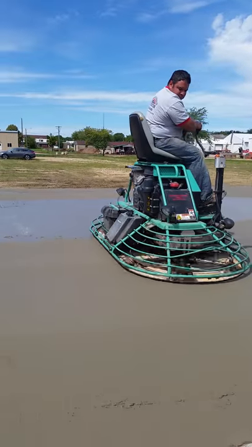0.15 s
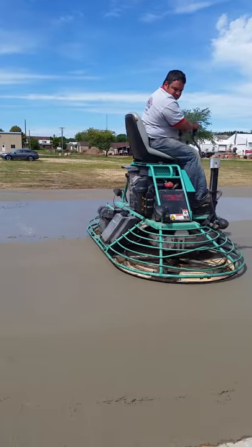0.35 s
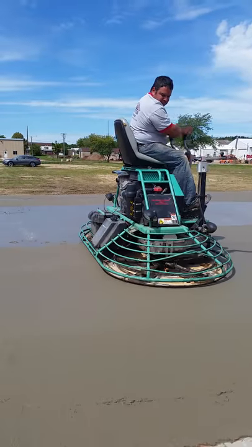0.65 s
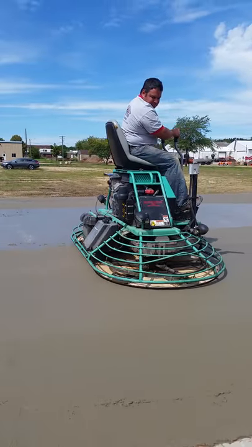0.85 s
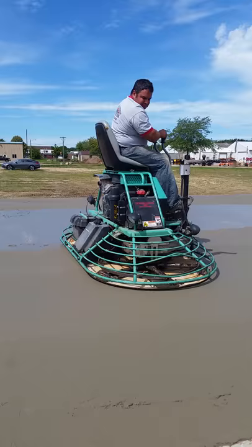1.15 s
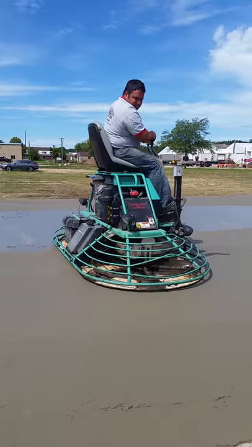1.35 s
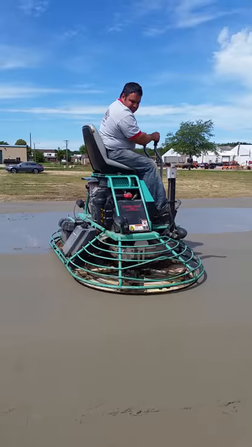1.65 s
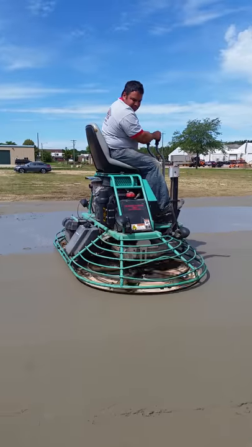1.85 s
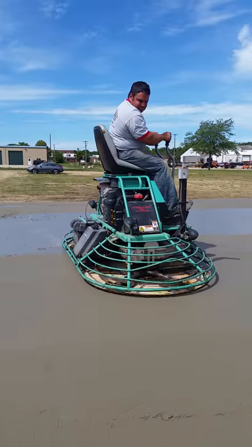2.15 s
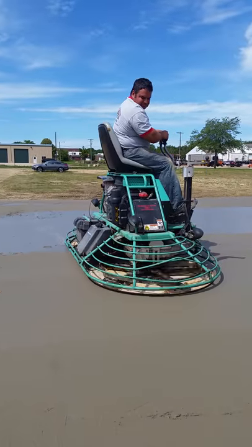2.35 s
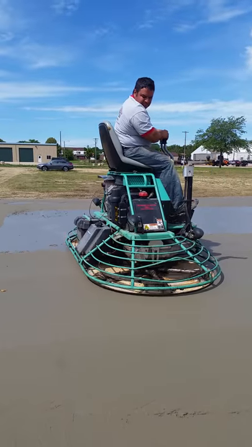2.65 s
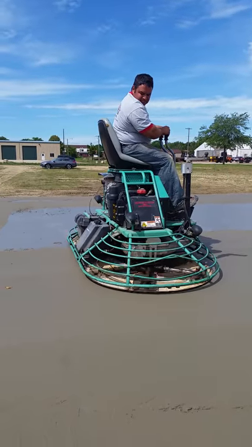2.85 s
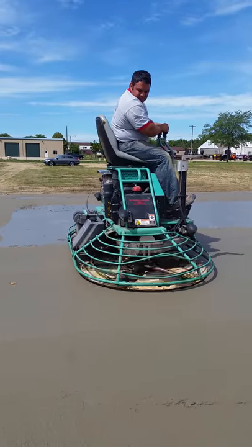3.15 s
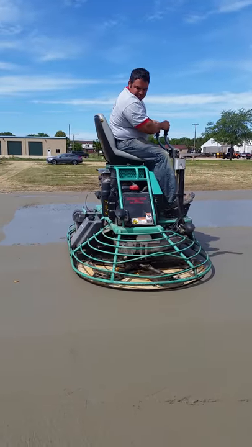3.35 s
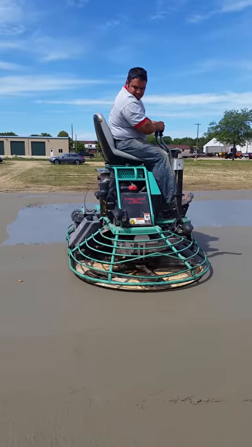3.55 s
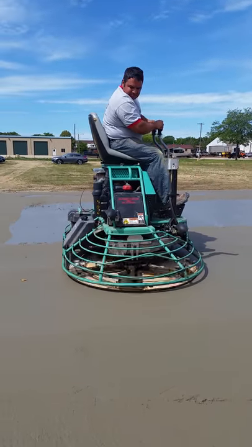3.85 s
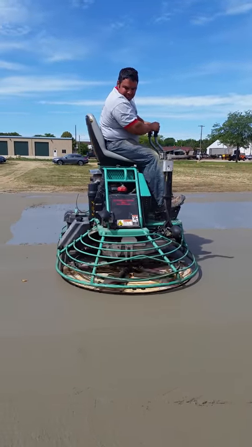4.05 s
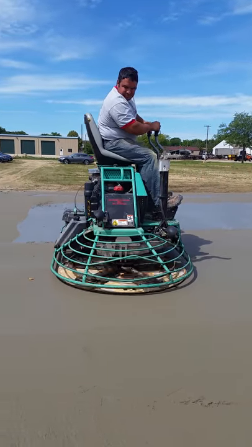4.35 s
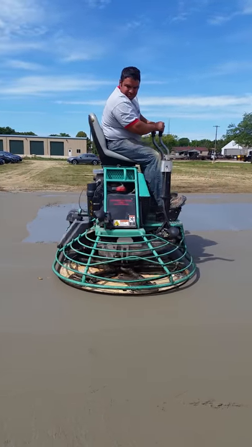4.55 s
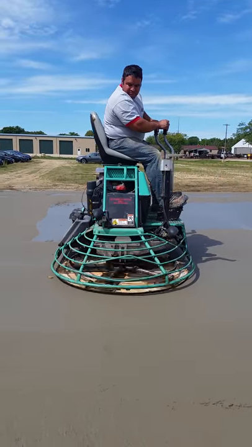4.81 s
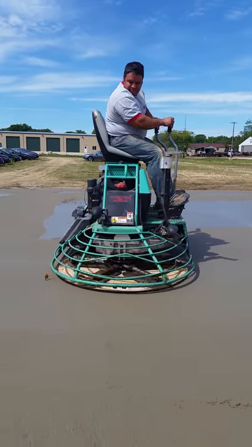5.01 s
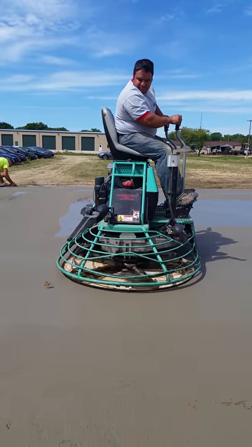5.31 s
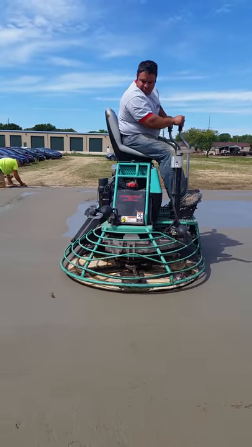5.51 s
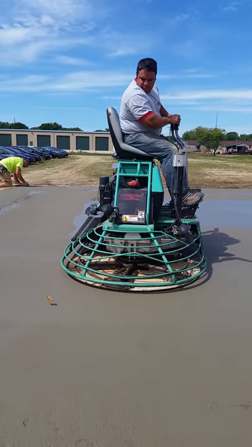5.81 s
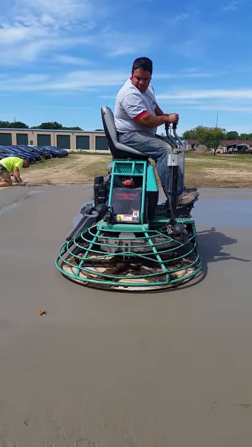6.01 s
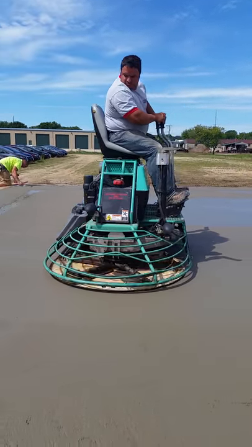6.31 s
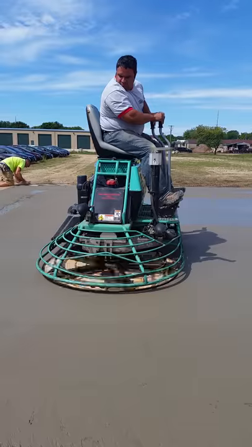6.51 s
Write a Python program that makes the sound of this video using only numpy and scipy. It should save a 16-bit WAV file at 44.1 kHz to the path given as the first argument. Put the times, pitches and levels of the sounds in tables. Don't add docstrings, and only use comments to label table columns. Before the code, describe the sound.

From 0 to about 6.7 seconds a ride-on power trowel runs without a break on wet concrete outdoors, a few metres from a hand-held phone. The two-cylinder engine gives a rough, lumpy drone, about 25 uneven double pulses per second, with its strongest boom near 120 Hz. Pitch sags slightly by 0.5-0.8 seconds as the boom strengthens, recovers a little around 1.5-1.9, then settles lower with small wavers. Throbbing casing roar fills the mids; steel pans spread a fine gritty hiss with blade flicker and tiny valve ticks, and gears whine very faintly. Between roughly 1.3 and 5.2 seconds the exhaust tone is a touch brighter as the machine turns, while the hiss colour shifts near 1.75. From 5.5 it is slightly louder and fuller, boom peaking around 6.2, and still running at the end. Stereo is narrow in the lows, wider in the hiss, dry and open.

```python
import sys
import numpy as np
from scipy import signal
from scipy.fft import rfft, irfft, next_fast_len
from scipy.io import wavfile

SR = 44100
rng = np.random.default_rng(int(sys.argv[2]) if len(sys.argv) > 2 else 0)


def digitize_waveform(pressure):
    field = np.atleast_2d(pressure).T
    bounded = np.clip(field, -1, 1)
    quanta = np.round(bounded * 32767).astype(np.int16)
    wavfile.write(sys.argv[1], SR, quanta)


def how_loud(loudness_db):
    steps = np.asarray(loudness_db, float) / 20
    return 10 ** steps


N = 294147

SECOND_FIRING = 0.425


def in_time(rows):
    seconds, *columns = np.transpose(rows)
    return [np.interp(np.arange(N) / SR, seconds, column) for column in columns]


def at_hz(points, hz):
    point_hz, value = np.transpose(points)
    return np.interp(np.log(hz), np.log(point_hz), value)


def drift(rate_hz):
    r = np.exp(-80 * np.pi * rate_hz / SR)
    coarse = rng.standard_normal(N // 40 + 2002)
    slow = signal.lfilter([1], [1, -2 * r, r * r], coarse)[2000:]
    return np.interp(np.arange(N) / 40, np.arange(len(slow)), slow / slow.std())


def slewing():
    t = np.arange(N) / SR
    facing = np.interp(t, [1.3, 2.1, 5.15, 5.4], [0, 1, 1, 0])
    eighth_db = -29 + 2.5 * facing - 0.1 * drift(2.2)

    side_from_s, side_to_s = 1.2, 3.9
    side_on = np.clip((t - side_from_s) / (side_to_s - side_from_s), 0, 1)
    cancelled_db, uncancelled_db, wander_db = -47, -39.5, 1.5
    cancel_db = cancelled_db + (uncancelled_db - cancelled_db) * side_on
    cancel_db = cancel_db + wander_db * (2 - side_on) * drift(2.5)
    return eighth_db, cancel_db


def exhaust(cycle, boom_db):
    # (order [times the cycle rate], level [dB against the boom])
    orders = [(1, -25), (2, -11), (3, -14.5), (4, -25), (5, 0.5), (6, -10), (7, -21), (8, -7), (9, -13),
              (10, -18.5), (11, -19), (12, -23), (13, -20.5), (14, -43), (15, -24.5), (16, -31), (17, -30),
              (18, -34.5)]
    cancelling = (4, 12)
    second_share, second_twist = 0.5, -1.0
    pulse_twist, silencer_smear = -3.12, 0.015
    waver_db = 0.3648

    eighth_db, cancel_db = slewing()
    out = np.zeros((2, N))
    for order, under_db in orders[1:]:
        level_db = boom_db + under_db
        if order == 8:
            level_db = eighth_db
        if order == 7:
            level_db = cancel_db
        if order in cancelling:
            level_db = level_db + 0.82 * (cancel_db - cancel_db.mean())
        level_db = level_db + waver_db * np.clip(order - 5, 0.5, 9) * drift(6.3)

        second_phase = second_twist - 2 * np.pi * order * SECOND_FIRING
        second = (second_share + 0.03 * order) * np.exp(1j * second_phase)
        twist = pulse_twist + np.angle(1 + second) + silencer_smear * (order - 5) ** 2
        twist = twist + (-0.6 if order in (4, 6) else 0.25)

        side = np.array([[-0.5], [0.5]]) * order
        tone = np.cos(2 * np.pi * order * cycle + twist + 0.023 * side)
        out += np.sqrt(2) * how_loud(level_db + 0.22 * side) * tone
    return out


def firing_gate(cycle, sharp):
    first = np.exp(sharp * (np.cos(2 * np.pi * cycle) - 1))
    second = np.exp(sharp * (np.cos(2 * np.pi * (cycle - SECOND_FIRING)) - 1))
    return first + second


def port_noise(centres_hz, band_db, left, right):
    # (frequency [Hz], likeness [0-1])
    likeness = [(30, .6), (100, .95), (300, .85), (660, .55), (900, .9), (1250, .5), (1800, .8), (2400, .6),
                (3000, .5), (3800, .6), (5600, .15), (6600, .53), (7800, .48), (8250, .1), (9000, .35),
                (12000, .08)]
    # (frequency [Hz], phase [rad])
    lead = [(60, .02), (400, .35), (650, 1.5), (800, .5), (1150, 1.3), (1350, .4), (1800, 1.0), (2300, 0),
            (3400, -.2), (4200, 1.3), (5400, .5), (5700, 2.7), (7500, 2.4), (8700, 3.1)]
    size = next_fast_len(N)
    hz = np.maximum(np.arange(size // 2 + 1) * SR / size, 1)
    white = rfft(rng.standard_normal((3, size)))

    alike = np.clip(at_hz(likeness, hz), 0, 1)
    shared = white[0] * np.exp(np.outer([-0.5j, 0.5j], at_hz(lead, hz)))
    ports = np.sqrt(alike) * shared + np.sqrt(1 - alike) * white[1:]
    ports = ports * how_loud(np.array([at_hz(left, hz), at_hz(right, hz)]))
    ports = ports * (hz > left[0][0]) / irfft(ports.mean(0), size).std()

    out = np.zeros((2, N))
    for k, gain_db in enumerate(band_db):
        share = np.interp(np.log(hz), np.log(centres_hz), np.arange(len(centres_hz)) == k)
        out += irfft(ports * share, size)[:, :N] * how_loud(gain_db)
    return out


def casing(cycle, casing_db):
    # (frequency [Hz], level [dB per Hz])
    roar_left = [(18, -12), (50, -12.5), (200, -8.5), (400, -10), (540, -14.5), (680, -11.5), (780, -5.5),
                 (1000, -8), (1250, -14), (1500, -31.5)]
    # (frequency [Hz], level [dB per Hz])
    roar_right = [(18, -16), (50, -11), (200, -6), (400, -6), (540, -9), (690, -12), (850, -7.5),
                  (1100, -5), (1300, -7.5), (1500, -39)]
    throb = firing_gate(cycle, sharp=3.3)
    early_throb = firing_gate(cycle + 0.077, sharp=2.1)
    bands = [
        casing_db.mean() + 2.7 * drift(4.3),
        casing_db + 1.2 * drift(13) + 1.5 * throb,
        casing_db + 0.37 * drift(12) + 2.9 * throb,
        casing_db + 0.6 * drift(16) + 2.1 * early_throb,
        casing_db + 0.4 * drift(27) + 1.3 * early_throb,
    ]
    return how_loud(0.5) * port_noise([80, 250, 500, 850, 1200], bands, roar_left, roar_right)


def pans(cycle, pressure_db):
    # (frequency [Hz], level [dB per Hz])
    hiss_left = [(1150, -23), (1350, -12), (1700, -13), (2100, -19.5), (2500, -15.5), (2950, -17.5),
                 (3400, -15), (5800, -17), (7800, -6), (8700, -11.5), (11000, -17.5), (13300, -17),
                 (13700, -28), (14500, -37)]
    # (frequency [Hz], level [dB per Hz])
    hiss_right = [(1150, -26), (1400, -6.5), (1950, -4), (2500, -5.5), (2950, -4), (3600, -8.5), (4500, -7),
                  (5200, -6.5), (6400, -5), (7800, 2), (8300, -3.5), (10000, -11), (11100, -16),
                  (12500, -12.5)]
    scrape = 0.98 * pressure_db
    sizzle = 1.2 * pressure_db
    together = 0.6 * drift(53)
    grit = [0.73 * together + 0.59 * drift(34) for band in range(7)]
    blades = np.sin(2 * np.pi * 9.15 * np.arange(N) / SR)
    tick = firing_gate(cycle, sharp=9.0)
    bands = [
        scrape + grit[0] + 0.66 * tick,
        scrape + grit[1] + 0.5 * tick,
        scrape + grit[2] + 0.4 * tick,
        scrape + grit[3],
        sizzle + grit[4] + 0.28 * blades,
        sizzle + grit[5] + 1.2 * tick,
        sizzle + grit[6] + 2.0 * tick,
    ]
    centres_hz = [1500, 2300, 3400, 5000, 7500, 10000, 13000]
    return how_loud(-19.5) * port_noise(centres_hz, bands, hiss_left, hiss_right)


def whine(cycle):
    # (order [times the cycle rate], level [dB], left over right [dB])
    gears = [(20, -53, -4), (24, -57, -6), (26, -59, -3), (30, -57, 3), (32, -43.8, 4.5), (36, -49, -1),
             (40, -50, -1), (46, -56, -8), (49, -56, -8), (68, -55, 0)]
    out = np.zeros((2, N))
    for order, db, pan_db in gears:
        level_db = db + 1.0 * drift(1.1) + np.array([[0.5], [-0.5]]) * pan_db
        tone = np.cos(2 * np.pi * order * cycle + 0.2 * drift(2.9))
        out += np.sqrt(2) * how_loud(level_db) * tone
    return out


def scene():
    # (time [s], speed [cycles per s], silencer boom [dB])
    engine = [(0.0, 24.966, -23.3), (0.25, 24.906, -23.2), (0.55, 24.469, -20.2), (0.8, 24.376, -20.7),
              (1.1, 24.538, -21.2), (1.45, 24.794, -21.2), (1.9, 24.773, -21.4), (2.35, 24.529, -20.7),
              (2.75, 24.319, -21.4), (3.05, 24.459, -20.7), (3.75, 24.395, -20.7), (4.1, 24.485, -21.4),
              (4.35, 24.346, -20.6), (4.7, 24.56, -21.3), (5.15, 24.519, -20.8), (5.5, 24.368, -20.2),
              (6.2, 24.33, -18.6), (6.67, 24.292, -19.5)]
    # (time [s], level [dB])
    pressure = [(0.0, -21.9), (0.3, -21.5), (0.45, -20.5), (0.95, -21), (1.15, -21), (1.4, -20),
                (1.7, -21.5), (2.0, -20), (2.45, -20), (2.68, -21.5), (2.95, -20), (3.4, -20),
                (4.05, -20.5), (4.35, -20), (5.05, -20), (5.3, -20), (5.65, -19), (6.67, -19.5)]
    per_s, boom_db = in_time(engine)
    cycle = 0.13 + np.cumsum(per_s) / SR

    pressure_db, = in_time(pressure)
    pressure_db = pressure_db - pressure_db.mean()
    casing_db = -31 + 0.27 * pressure_db + 0.52 * (boom_db - boom_db.mean())

    machine = exhaust(cycle, boom_db) + casing(cycle, casing_db)
    return machine + pans(cycle, pressure_db) + whine(cycle)


def dip(x, hz, width_hz, depth):
    r = np.exp(-np.pi * width_hz / SR)
    top = np.array([1, 0, -1]) * (1 - r * r) / 2
    bottom = [1, -2 * r * np.cos(2 * np.pi * hz / SR), r * r]
    return x - depth * signal.lfilter(top, bottom, x)


def low_pass(x):
    return signal.sosfilt(signal.butter(12, 15520, fs=SR, output="sos"), x)


def record(dry):
    # (frequency [Hz], width [Hz], depth before turn [0-1], depth after turn [0-1])
    dips_left = [(1240, 170, 0.3, 0.23), (1450, 190, 0, 0.11), (1670, 220, -.3, 0.12),
                 (2960, 250, 0.5, 0.23), (3850, 160, 0, 0.42), (4230, 180, 0, -0.12), (5750, 250, 0.2, .3)]
    # (frequency [Hz], width [Hz], depth before turn [0-1], depth after turn [0-1])
    dips_right = [(1490, 180, 0.1, 0.26), (1830, 190, 0.25, -0.042), (2430, 360, -0.14, 0.22),
                  (3590, 330, 0.8, 0.29), (4003, 186, 0.42, 0.83), (5590, 360, 0.5, .3),
                  (5730, 370, 0.14, 0.45), (6150, 250, 0.19, 0.19), (6500, 430, -0.28, -0.27),
                  (6900, 190, -0.13, 0.12), (8250, 360, 0.34, 0.16), (12600, 370, 0.0075, 0.2)]
    turn_s, turn_span_s = 1.75, 0.64
    turned = np.clip((np.arange(N) / SR - turn_s) / turn_span_s + 0.5, 0, 1)

    ports = list(dry)
    for side, dips in enumerate((dips_left, dips_right)):
        for hz, width_hz, before, after in dips:
            depth = before + (after - before) * turned
            depth = depth * (1 + 0.22 * drift(5.0))
            ports[side] = dip(ports[side], hz, width_hz, np.minimum(depth, 0.95))

    soft = 1.15 * np.tanh(np.array(ports) / 1.15)
    top_cut = signal.ellip(14, 0.3, 95, 14490, fs=SR, output="sos")
    mix = signal.sosfilt(top_cut, soft)
    return low_pass(mix)


dry = scene()
out = record(dry)
digitize_waveform(out)
```